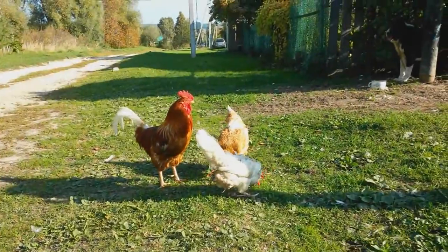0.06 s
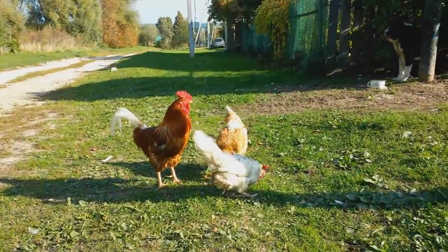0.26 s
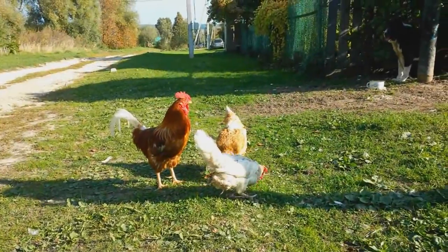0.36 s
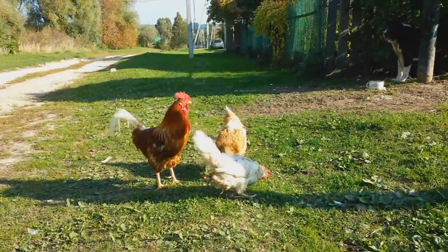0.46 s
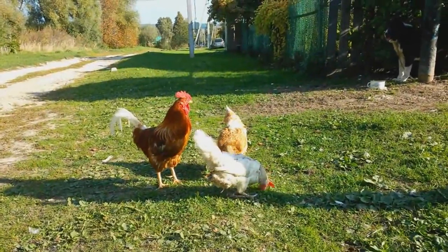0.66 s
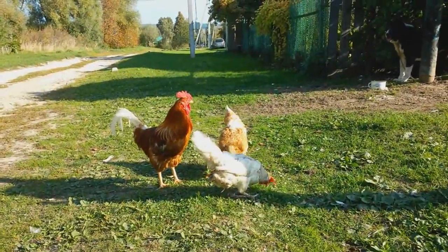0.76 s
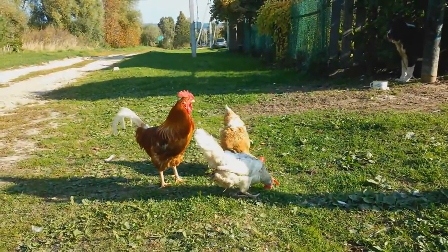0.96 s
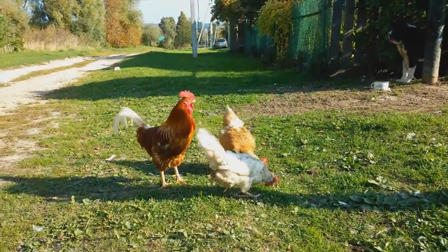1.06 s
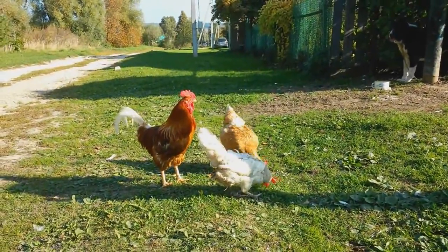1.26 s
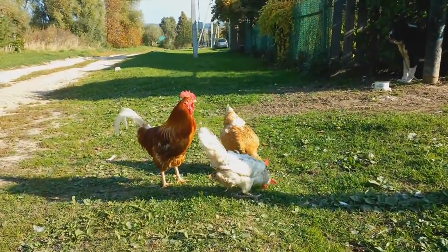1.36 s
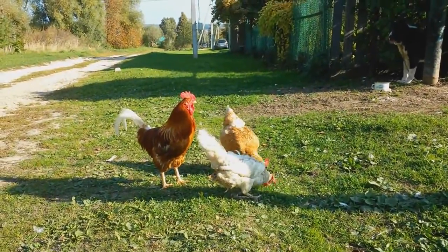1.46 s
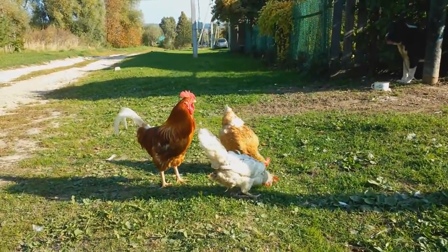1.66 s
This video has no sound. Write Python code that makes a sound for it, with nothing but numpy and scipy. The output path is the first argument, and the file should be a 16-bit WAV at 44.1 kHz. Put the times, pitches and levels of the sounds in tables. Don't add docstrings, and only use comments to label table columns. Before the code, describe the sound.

A rooster in an open grassy yard gives a tiny rounded cluck at 0.2 s, then from 0.3 to 1.5 s a long, hollow, nearly pure call around 1 kHz. It flutters about sixty times a second, smoother near 0.6 s, choppier from 0.9, loudest near 1.2, then sinks and fades. Faint high bird chips, clearest near 0.7 s, light low wind, far rumble and soft hiss surround it.

```python
import sys
import numpy as np
from scipy import signal
from scipy.io import wavfile
from scipy.ndimage import uniform_filter1d

SR = 44100
rng = np.random.default_rng(int(sys.argv[2]) if len(sys.argv) > 2 else 0)


def boost_factor(decibels):
    exponent = np.asarray(decibels, float) / 20
    return 10 ** exponent


def to_wav(s):
    ch = np.atleast_2d(s).T
    pcm = np.round(np.clip(ch, -1, 1) * 32767)
    wavfile.write(sys.argv[1], SR, pcm.astype(np.int16))


N = 74970


def in_time(rows):
    s, *columns = np.transpose(rows)
    return [np.interp(np.arange(N) / SR, s, c) for c in columns]


def rms_one(x):
    return x / np.sqrt(np.mean(x ** 2) + 1e-20)


def drift(rate_hz):
    r = np.exp(-2 * np.pi * rate_hz / SR)
    settle = 30000
    wander = signal.lfilter([1], [1, -2 * r, r * r], rng.standard_normal(N + settle))
    return rms_one(wander[settle:])


def delayed(x, samples):
    return np.interp(np.arange(N) - samples, np.arange(N), x, left=0)


def sweep(hz):
    return 2 * np.pi * np.cumsum(hz) / SR


def banded_noise(colour, alike, patchy_db, rate_hz):
    hz, db = np.transpose(colour)
    edges = hz[0] * np.sqrt(2) ** np.arange(int(2 * np.log2(hz[-1] / hz[0])) + 2)
    settle = 9000
    white = rng.standard_normal((2, 2, N + settle))
    out = 0
    for k, (low, high) in enumerate(zip(edges, edges[1:])):
        sos = signal.butter(2, [low, min(high, .45 * SR)], "band", fs=SR, output="sos")
        mid, side = signal.sosfilt(sos, white[k % 2])[:, settle:]
        band_db = np.interp(np.log(low * high) / 2, np.log(hz), db)
        gain = boost_factor(band_db + patchy_db * drift(rate_hz))
        out = out + gain * (np.sqrt(1 + alike) * mid + np.sqrt(1 - alike) * side * [[1], [-1]])
    return rms_one(out)


# time in seconds, level in dB, left minus right in dB.
GUSTS = [(0.0, -59.5, -2.5), (0.07, -64.5, 0), (0.212, -63.5, -4.0), (0.24, -57, -16), (0.344, -53, -0.5),
         (0.59, -70.5, 0.0), (0.644, -68, 2), (0.742, -69, 12), (0.794, -58, -3), (.9, -55, 0),
         (1.122, -59, 2.5), (1.15, -58, -3.5), (1.174, -58.5, -2.5), (1.396, -54, 0.5), (1.46, -58, -2),
         (1.56, -66, -0.5), (1.7, -66, -2)]
# frequency in Hz, level in dB per Hz.
WIND_COLOUR = [(35, -26), (60, -1), (103, 5), (255, -6.5), (286, -10.5), (404, -13.5), (566, -21),
               (600, -12), (780, -30), (1320, -120)]


def wind():
    level_db, pan_db = in_time(GUSTS)
    lumps_db = 1.2 * drift(26)
    sides_db = np.array([pan_db, -pan_db]) / 2
    return boost_factor(level_db + lumps_db - 2.5 + sides_db) * banded_noise(WIND_COLOUR, .3, 2.9, 12)


# frequency in Hz, level in dB per Hz.
RUMBLE_COLOUR = [(12, -51), (20, -30), (42, 2.5), (86, -1.5), (125, -8), (200, -26), (260, -8), (440, -120)]


def rumble():
    ducking_db = 1.5 * (in_time(CALL)[0] + 55)
    return boost_factor(-63 - ducking_db) * banded_noise(RUMBLE_COLOUR, .4, 1.9, 3.4)


# time in seconds, level in dB.
HISS = [(0.0, -73.5), (0.07, -77), (0.198, -76.5), (0.236, -67), (0.326, -69.5), (0.638, -66.5),
        (0.946, -68.5), (1.32, -67), (1.58, -75.5), (1.7, -77)]
# frequency in Hz, level in dB per Hz.
HISS_COLOUR = [(150, -42), (250, 3), (1480, -4), (1730, -7), (3290, -9.5), (5200, -9.5), (6940, -12),
               (14400, -15)]


def hiss():
    level_db, = in_time(HISS)
    return boost_factor(level_db + 8.5) * banded_noise(HISS_COLOUR, 0.024, 0.19, 2.7)


# multiple of the pitch, level in dB.
CLUCK_OVERTONES = [(2, -23.5), (3, -36), (6.5, -39)]


def cluck():
    start_s, length_s = .2135, .028
    u = np.clip((np.arange(N) / SR - start_s) / length_s, 0, 1)
    pitch_hz, sag_hz = 854, 250
    phase = sweep(pitch_hz + sag_hz * (1 - 2 * u) ** 5)
    swell = np.sin(np.pi * u ** 1.18).clip(0) ** 1.1
    tone = sum(boost_factor(db) * np.sin(k * phase) for k, db in [(1, 0), *CLUCK_OVERTONES])
    return boost_factor(-33.5) * swell * tone


# start in seconds, length in seconds, start pitch in Hz,
# end pitch in Hz, peak level in dB.
CHIRPS = [(.215, .035, 5500, 5350, -66), (.3, .045, 5600, 5150, -64), (.585, .016, 5350, 5650, -62),
          (.575, .02, 4900, 5100, -65), (.6, .034, 3650, 4260, -60), (.628, .042, 4240, 4245, -59),
          (.716, .009, 5750, 4450, -52), (.72, .012, 5250, 5450, -54), (.732, .014, 5300, 5500, -62),
          (.755, .014, 5300, 5050, -63), (.76, .014, 4700, 4750, -64), (.7, .012, 5500, 5450, -66),
          (.726, .012, 4900, 4750, -62), (.74, .04, 5400, 5300, -65), (.742, .02, 4900, 4700, -64),
          (1.132, .024, 5300, 5050, -64), (1.212, .02, 5250, 5100, -66), (1.28, .016, 4650, 4600, -62),
          (1.293, .016, 5300, 5150, -67), (1.4, .026, 5350, 5050, -66), (1.488, .035, 5400, 4900, -67),
          (1.565, .03, 5500, 4900, -68), (1.62, .035, 5350, 5300, -72)]


def songbirds():
    out = np.zeros(N)
    warble_hz = 45 * drift(220)
    for s, length, start_hz, end_hz, db in CHIRPS:
        u = np.clip((np.arange(N) / SR - s) / length, 0, 1)
        swell = np.sin(np.pi * u) ** .8
        glide_hz = start_hz + (end_hz - start_hz) * u
        out += boost_factor(db) * swell * np.sin(sweep(glide_hz + warble_hz))
    return out


# centre in Hz, width in Hz, lift in dB.
THROAT = [(1060, 360, 1), (1430, 260, 20), (2150, 260, 6), (3600, 640, 17)]


def throat_db(hz):
    return sum(lift_db / (1 + (2 * (hz - centre_hz) / width_hz) ** 2)
               for centre_hz, width_hz, lift_db in THROAT)


# share of the beat, opening from 0 to 1, pitch shift in Hz.
CHOKED_BEAT = [
    (0, .13, -390),
    (.1, .26, -350),
    (.2, .46, -240),
    (.3, .64, -90),
    (.39, .98, 25),
    (.52, 1, 15),
    (.7, .76, -70),
    (.8, .6, -170),
    (.87, .24, -310),
    (1, .13, -390),
]


def choked_beat(beats):
    share, opening, shift_hz = np.transpose(CHOKED_BEAT)
    place = (beats + .5) % 1
    return [uniform_filter1d(np.interp(place, share, c), size=40) for c in (opening, shift_hz)]


# time in seconds, level in dB, pitch in Hz, pitch swing in Hz,
# closure of each flutter (0 open, 1 choked).
CALL = [(0.297, -50.5, 885, 165, 0.4), (0.399, -49.3, 950, 165, 0.33), (.49, -47, 1040, 115, .22),
        (0.572, -44.6, 1095, 85, 0.1), (.64, -47.6, 1145, 75, .05), (.76, -44.3, 1075, 150, .3),
        (0.902, -45, 1012, 150, .9), (1.04, -43.6, 1035, 150, 1), (1.23, -39.3, 1085, 150, .92),
        (1.348, -45.5, 960, 80.5, 1.08), (1.474, -51.5, 815, 70, 0.95)]
# time in seconds, beats counted so far.
FLUTTER = [(.2967, -1), (.3125, 0), (.471, 10), (.623, 20), (.78, 30), (.942, 40), (1.1065, 50),
           (1.271, 60), (1.352, 65), (1.486, 73)]
# time in seconds, loss in dB (negative is louder), pitch drop in Hz
UNEVEN_BEATS = [(.302, 7, 120), (.327, 2, -10), (.344, 5, 10), (.361, 0, -20), (.376, -1, 0), (.392, 0, -40),
                (.407, 4, 110), (.425, -2, 0), (.438, 1, 10), (.456, 1, 30), (.485, 1, 30), (.502, 2, 0),
                (.516, .5, -50), (.547, -1, 20), (.562, -1, 50), (.577, -1, 90), (.593, 0, 40), (.608, 0, -60),
                (.623, 0, 70), (.654, 1, -25), (.686, 0, 30), (.702, 3, 0), (.733, 4, 0), (.78, 8, 70),
                (.797, 0, 20), (.81, 2, 20), (.829, 6, 50), (.846, -1, 25), (.86, 1, -40), (.878, 4, -5),
                (.894, 3, 50), (.91, -2, -10), (.943, 12, 45), (.96, 1, 20), (.975, 2, 0), (.992, 2, 20),
                (1.008, 3, 80), (1.025, 1, 20), (1.073, 2, -45), (1.089, 10, 140), (1.107, 4, 40),
                (1.123, 5, 40), (1.141, 2, 90), (1.157, 0, 30), (1.173, 2, 45), (1.19, 2, 45), (1.238, -1, -20),
                (1.254, 5, -10), (1.272, 3, -10), (1.288, 3, 0), (1.304, 2, -45), (1.321, 10, 70),
                (1.337, -3, -40), (1.352, 6, 50), (1.369, 4, 10), (1.385, -2, 20), (1.401, 6, 70),
                (1.419, 4, 30), (1.435, 7, 75), (1.452, 1, -10), (1.469, 3, 90)]
# multiple of the pitch, level in dB.
OVERTONES = [(2, -27.5), (3, -26.5), (4, -39), (5, -53)]
# time in seconds, lift of the overtones in dB.
STRAIN = [(.3, 5), (.47, 3), (.525, 6), (.56, -3), (.64, 1), (.76, -3), (.88, 4), (1.2, -1), (1.45, 9)]
# time in seconds, sharpness of the pulses.
FAILING = [
    (1.25, 1),
    (1.34, 1.3),
    (1.4, 2.4),
    (1.46, 3),
]


def long_call():
    t = np.arange(N) / SR
    level_db, pitch, swing, closure = in_time(CALL)
    beats = in_time(FLUTTER)[0] + .03 * drift(18.74)
    closure = np.clip(closure + .06 * drift(20.9), 0, 1)
    for s, loss_db, drop_hz in UNEVEN_BEATS:
        near = np.exp(-((t - s) / .007) ** 2)
        level_db = level_db - loss_db * near
        pitch = pitch - drop_hz * near

    opening, shift_hz = choked_beat(beats)
    turn = 2 * np.pi * beats
    wobble = swing * (np.cos(turn) - .2 * np.sin(2 * turn) - .25 * np.cos(2 * turn))
    pitch = pitch + (1 - closure) * wobble + closure * shift_hz + 18 * drift(71)

    onset_s = .0074
    edges = np.clip(np.minimum(t - CALL[0][0], CALL[-1][0] - t) / onset_s, 0, 1)
    shimmer_db = 1.0 * drift(125) + .7 * drift(20)
    envelope = boost_factor(level_db + shimmer_db) * edges

    phase = sweep(pitch)
    strain_db, = in_time(STRAIN)
    tone = 0
    for k, db in [(1, 0), *OVERTONES]:
        dulled_db = db * (1 + .13 * closure)
        partial_db = dulled_db + throat_db(k * pitch) + (k > 1) * strain_db
        tone = tone + boost_factor(partial_db) * np.sin(k * phase)

    sos = signal.butter(2, [620, 1600], "band", fs=SR, output="sos")
    rush = rms_one(signal.sosfilt(sos, rng.standard_normal(N)))
    breath = boost_factor(-22) * closure * np.sqrt(opening) * 2.0 * rush
    sharpness, = in_time(FAILING)
    pulses = 1 - closure * (1 - opening ** sharpness)
    return envelope * (pulses * tone + breath)


# delay in seconds, left level in dB, right level in dB.
ECHOES = [
    (.0031, -18, -28),
    (.011, -28, -19),
    (.033, -27, -31),
    (.049, -33, -30),
]


def yard(x):
    pan_db, lag_samples = -.3, 2.3
    out = np.array([boost_factor(pan_db) * delayed(x, lag_samples), boost_factor(-pan_db) * x])
    for s, left_db, right_db in ECHOES:
        out += boost_factor(np.array([[left_db], [right_db]])) * delayed(x, s * SR)
    return out


def scene():
    at_microphone = wind() + rumble() + hiss()
    birds = cluck() + songbirds() + long_call()
    return yard(birds) + at_microphone


def band_limit(x):
    return signal.sosfilt(signal.butter(12, 14540, fs=SR, output="sos"), x)


def record(dry):
    return band_limit(dry)


dry = scene()
out = record(dry)
to_wav(out)
```